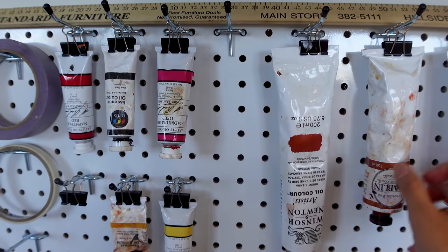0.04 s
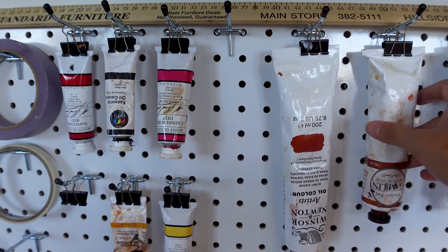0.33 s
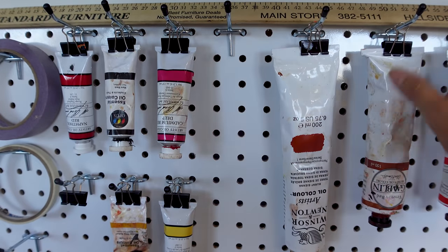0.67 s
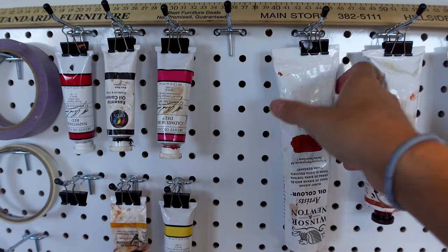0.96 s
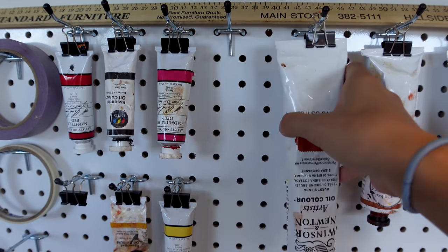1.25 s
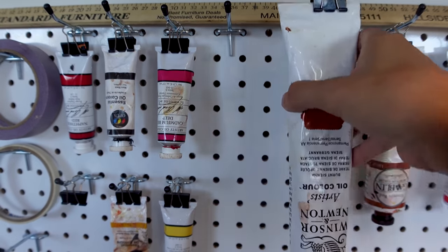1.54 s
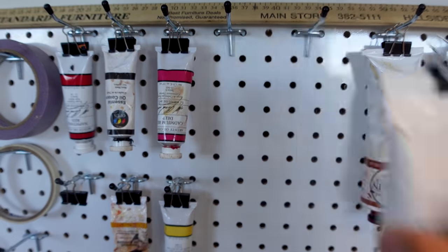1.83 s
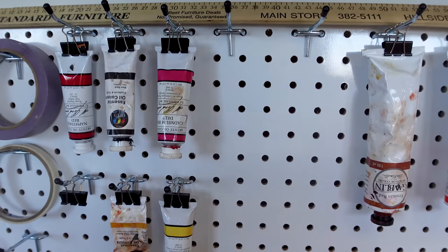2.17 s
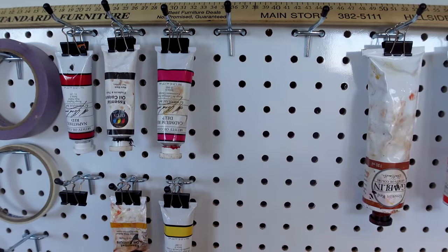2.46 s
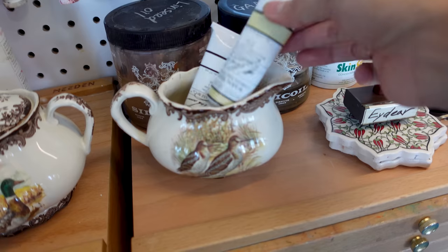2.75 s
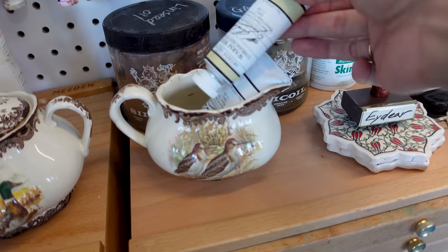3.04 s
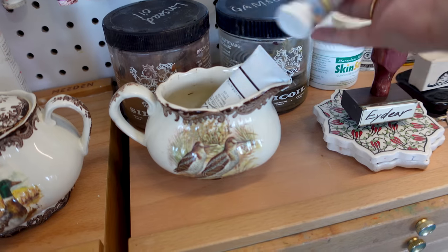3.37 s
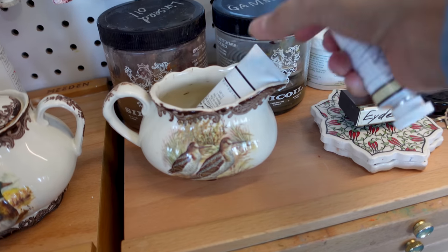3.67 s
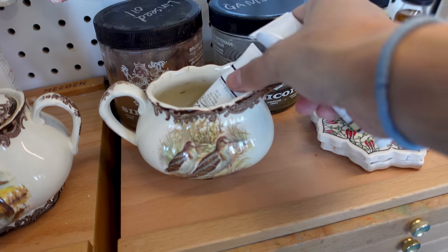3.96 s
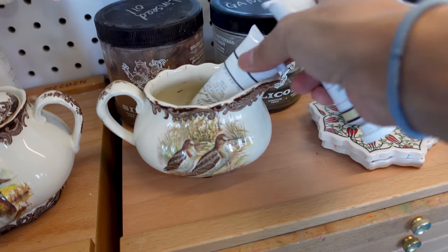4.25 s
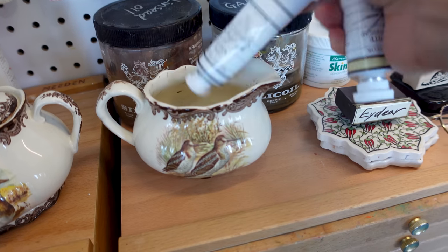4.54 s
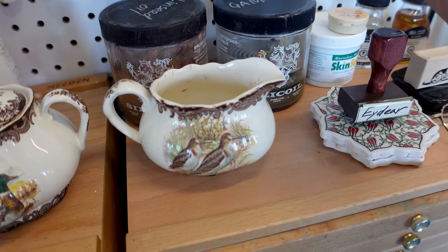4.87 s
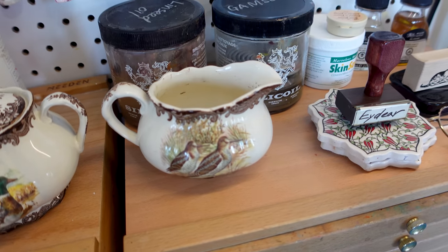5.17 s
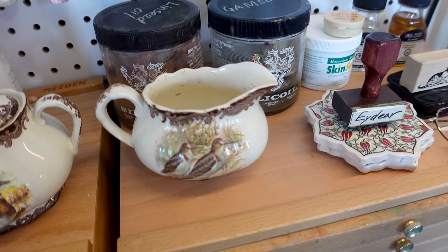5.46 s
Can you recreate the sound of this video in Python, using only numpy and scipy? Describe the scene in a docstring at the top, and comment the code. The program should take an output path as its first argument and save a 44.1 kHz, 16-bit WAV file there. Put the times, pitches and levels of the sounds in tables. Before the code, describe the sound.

A metal binder clip clicks off a pegboard hook, then paint tubes knock and clink in a ceramic jug in a quiet room.

```python
"""A paint tube, just hung up, rattles against a pegboard in a small studio. The next is lifted off: its
binder clip clicks along the wire hook, which snaps back into the board. Then tubes knock in a ceramic jug
on a wooden table. Each impact excites the modes of the body struck, and friction adds a hiss as fingers
rub and crinkle the tubes. Between board and jug a bird whistles twice outside, over soft room noise."""
import sys
import numpy as np
from scipy import signal
from scipy.fft import rfft, irfft
from scipy.io import wavfile

SR = 44100
rng = np.random.default_rng(int(sys.argv[2]) if len(sys.argv) > 2 else 0)


def master(y):
    """Save y as 16-bit WAV."""
    cut = np.clip(np.atleast_2d(y).T, -1, 1)
    pcm = np.round(cut * 32767)  # scale
    wavfile.write(sys.argv[1], SR, pcm.astype(np.int16))


N = 242991
TIME = np.arange(N) / SR

# Impacts. Each row: start in seconds, level in dB, spectral tilt in dB per octave.
BOARD_KNOCKS = [(0.0095, -8, -2), (0.0215, -20, 5), (0.0578, -17, -1.5), (0.0843, -21, -1),
                (0.0995, -20, -1.5), (0.1587, -29, 0), (1.5726, -2.5, 4), (1.5818, -11, 1.5),
                (1.6212, -18.5, 1.5)]   # hook and tube on the pegboard
CLIP_CLICKS = [(1.193, -27, -9), (1.21, -30.5, -8), (1.2658, -18.5, -4), (1.3013, -15.5, 1.5),
               (1.352, -19.5, 3), (1.3876, -10, 4), (1.426, -16.5, -2.5), (1.4436, 3, 5.5),
               (1.4474, -7.5, 0), (1.4568, -11, 2), (1.4611, -5, 3.5), (1.472, -2, 4.5), (1.4887, -9.5, 0),
               (1.497, -12, 1), (1.5568, -13, -4.5), (1.5753, -5.5, -1)]   # steel clip on its hook; the last is the hook's snap
TUBE_TICKS = [(0.9945, -36, -3), (1.0511, -36.5, -2), (2.2295, -26, 5.5), (2.258, -31, 4.5),
              (3.206, -35, -10.5), (3.4917, -26.5, -4.5), (3.7228, -37, -9), (3.8969, -33, -8.5),
              (3.9448, -34.5, -10.5), (4.585, -26, 1), (4.8244, -26.5, -2), (4.8657, -34, -5.5),
              (4.9515, -26.5, -1)]   # soft metal tubes in the fingers
# Tubes striking the jug. Each row: start in seconds, level in dB, tilt in dB per octave,
# ringing from the lip in dB, ringing from the wall in dB.
JUG_KNOCKS = [(2.771, -33, 2, -74, -83), (2.845, -24.5, -9, -52.5, -85), (2.8885, -12.5, -2.5, -41, -72),
              (2.8995, -14, -6.5, -48, -66), (2.9023, -18, 6, -46.5, -70), (2.9054, -6.5, -5.5, -31, -61),
              (2.9279, -11.5, -8, -43.5, -60), (2.988, -37, -15, -45, -80), (4.1902, -31.5, 4, -56, -89),
              (4.2542, -17, 3.5, -64, -56), (4.266, 2, 5, -57, -37), (4.2783, -5, 1.5, -63, -27),
              (4.3249, -28, 0.5, -70, -39), (4.4333, -3, -1.5, -69, -35), (4.4353, -6.5, 0, -67, -61),
              (4.448, -1.5, -1, -62, -54)]
# A leaning tube damps the jug. Each row: start in seconds, length in seconds, ringing lost in dB.
JUG_LEANS = [(2.938, 0.023, 19), (3.092, 0.06, 12), (4.353, 0.02, 5), (4.436, 0.022, 11.5)]

# Runs of bounces, then friction strokes.
# Each row: start in seconds, length in seconds, first level in dB, change in dB per second.
BOARD_RATTLE = (-0.01, 0.07, -17.5, -82)   # the hung tube swings to rest
CLIP_RATTLE = (1.395, 0.165, -19.5, -12)
BOARD_BUZZES = [(0.015, 0.27, -39.5, -71)]   # tube and clip chatter on the board
JUG_BUZZES = [(4.262, 0.16, -40.5, -42)]   # the lifted tube buzzes against the jug
GLAZE_DRAGS = [(2.86, 0.033, -65, 50), (4.07, 0.074, -77.5, 60)]   # a cap drags on the glaze
HOOK_SLIDES = [(1.19, 0.078, -64, -9.5), (1.285, 0.27, -51.5, -14.5)]
FINGER_SLIDES = [(3.225, 0.23, -61, -25), (4.87, 0.33, -65, -22)]   # fingers slide on a tube
TUBE_CRINKLES = [(2.235, 0.076, -63, -30), (2.333, 0.015, -53.5, -150), (2.355, 0.07, -51.5, -105)]   # a gripped tube's thin wall crinkles
TUBE_SHIFTS = [(3.725, 0.28, -55, -31)]   # tubes shift against each other

# Spectral envelopes of the bodies, surfaces and room noise. Each row: frequency in Hz, level in dB.
BOARD_SPECTRUM = [(40, -69), (90, -46), (140, -28.5), (250, -19.5), (450, -20.5), (750, -10.5),
                  (1000, -1.5), (1250, 1.5), (1600, -1.5), (2100, -5), (2800, -12), (6200, -13),
                  (9000, -27.5), (16000, -49.5)]
CLIP_SPECTRUM = [(60, -63), (350, -41), (650, -22.5), (1000, -7), (1300, -0.5), (1800, 1.5), (2300, -3),
                 (3300, -0.5), (4300, -4.5), (4900, -11), (6000, 1.5), (7000, -10), (11000, -19.5),
                 (13500, -27), (16000, -44.5)]
JUG_SPECTRUM = [(40, -57), (75, -26), (115, -15.5), (180, -3.5), (330, -8.5), (470, -5.5), (670, -2.5),
                (820, 7), (1500, 2.5), (2200, -0.5), (3400, -16), (4300, -16.5), (7000, -25),
                (11500, -33.5), (16000, -59)]
TUBE_SPECTRUM = [(100, -28), (600, -20), (1500, 3), (2200, 5), (3500, 1), (6000, -7.5), (10000, -14),
                 (16000, -37)]
SKIN_SPECTRUM = [(800, -18), (2500, 4), (3800, 1), (5200, -1.5), (7000, -11), (10000, -20.5), (16000, -31)]
CRINKLE_SPECTRUM = [(1000, -25), (3500, -6.5), (5000, -4), (6200, 2), (7100, -5.5), (8000, 0), (9500, -6),
                    (11500, -17), (16000, -29)]
SHIFT_SPECTRUM = [(200, -33), (700, -11), (1000, 0.5), (1500, 3.5), (2000, -4), (3000, -13.5),
                  (6000, -29.5), (16000, -48)]
AIR_SPECTRUM = [(20, -28), (50, -22), (100, -24.5), (160, -19.5), (350, -14.5), (600, -10), (900, -2),
                (1150, 0.5), (1450, -4), (2000, -10.5), (3200, -16.5), (5000, -25.5), (9000, -31.5),
                (16000, -36)]

# Damped resonances. Each row: centre in Hz, width in Hz, height in dB.
BOARD_PEAKS = [(1226, 62, 7.5), (1390, 35, 0), (1530, 50, 2), (1980, 90, 2)]
CLIP_PEAKS = [(1924, 230, 5), (2700, 170, 5), (3310, 98, 3), (3730, 70, 6), (3900, 120, 5), (4270, 86, 6),
              (5710, 260, 4.5), (6480, 240, 4.5), (7600, 100, 5), (10700, 290, 2.5), (11300, 300, 6.5)]
JUG_PEAKS = [(780, 100, 1.5), (930, 100, 3.5), (1188, 130, 4), (1496, 96, 4.5), (1944, 48, 4),
             (1990, 58, 5.5), (4250, 340, 11), (5830, 330, 8.5), (6940, 290, 9)]   # jug and table together
GLAZE_PEAKS = [(9530, 300, 32)]   # the mode that sings under a dragged cap
WIRE_MODES = [(4060, -9, .2), (4300, -4, .25), (4350, -8, 0.27), (5760, -10.5, .4), (5640, -7, 0.546),
              (5810, -11.5, 0.38), (5610, 3.5, 0.46), (5630, 4, 0.34), (6100, -9.5, 0.34),
              (6250, 13.5, 0.318), (6000, -1.5, 0.28), (5930, 6.5, 0.31), (6380, -10.5, .3),
              (6570, -7.5, .28), (7900, -10.5, .2), (11500, -12.5, 0.2)]
# Modes of the jug. Each row: frequency in Hz, level in dB when struck at the lip,
# level in dB when struck on the wall, T60 in seconds.
JUG_MODES = [(2164, -26, -20, .3), (2428, -15, -14, .3), (2455, -28, 1, .38), (2757, -2, -15, .4),
             (2774, -14, -4, .3), (3187, -28, -29, .25), (3505, -17, -28, .35), (4010, -15, -20, .13),
             (4247, -22, -14, .2), (4330, -28, -17, .16), (4450, -30, -19, .2), (5200, -16, -35, .28),
             (5770, -29, -23, .18), (5835, -28, -19, .2), (5960, -30, -22, .15), (6767, -20, -23, .16),
             (7127, -20, -21, .22), (7250, -28, -24, .18), (7660, -28, -28, .14), (8473, -23, -21, .14),
             (9469, -3, -38, .08), (10010, -15, -35, .09), (11150, -15, -36, .07), (11364, -26, -23, .08),
             (13200, -34, -31, .08)]

# Bird calls. Each row: start in seconds, length in seconds, loudest moment in seconds, its level in dB.
WHISTLES = [(1.809, 0.3, 2.027, -53.5), (2.331, 0.454, 2.56, -56.5)]
# Course of the room noise. Each row: time in seconds, level in dB.
AIR_LEVEL = [(0.9, -59.5), (1.9, -57), (3.1, -59.5), (5.5, -60)]
# Faint tones in the room. Each row: start in seconds, end in seconds, frequency in Hz, level in dB.
ROOM_TONES = [(0, 1.15, 196, -83.5), (2.788, 5.51, 985, -72), (4.85, 5.525, 1421, -68.5)]
# Reverberation of the studio. Each row: frequency in Hz, T60 in seconds.
ROOM_T60 = [(100, 0.75), (400, 0.63), (1200, 0.45), (3000, 0.73), (6000, 0.7), (10000, 0.53), (16000, 0.23)]


def pegboard():
    """Impact excitation: hook and tube knock, bounce and chatter on the resonant board."""
    contacts = BOARD_KNOCKS + bounces(BOARD_RATTLE, tilt_db=0.5, scatter_db=5, count=9)
    raps = knocks(contacts, BOARD_SPECTRUM, BOARD_PEAKS,
                  ring_db=-16, ring_t60=0.034, doubling_db=17, uneven_db=0, spread_s=0.000849)
    return raps + rub(BOARD_BUZZES, BOARD_SPECTRUM, BOARD_PEAKS, attack_s=.01, release_s=.36, grain_db=1.5)


def binder_clip(wire_db, snap_db):
    """Free vibration after impact: each click sets the wire ringing, with extra force at the snap."""
    contacts = CLIP_CLICKS + bounces(CLIP_RATTLE, tilt_db=3.5, scatter_db=5.5, count=9)
    out = knocks(contacts, CLIP_SPECTRUM, CLIP_PEAKS,
                 ring_db=-21.5, ring_t60=0.022, doubling_db=28, uneven_db=3.5, spread_s=.0012)
    wire = wire_ring(split=0.07, count=6)
    snap_s = CLIP_CLICKS[-1][0]
    for start, level_db, _ in contacts:
        add(out, start, from_db(level_db + wire_db + snap_db * (start == snap_s)) * wire)
    return out


def wire_ring(split, count):
    """Beating: handles and hook are nearly alike, so each mode splits into close ones that shimmer."""
    detunings = 1 + split * rng.uniform(-1, 1, (count, len(WIRE_MODES)))
    modes = [(hz * k, db, t60) for row in detunings for (hz, db, t60), k in zip(WIRE_MODES, row)]
    return ring(modes) / np.sqrt(count)


def jug():
    """Modal superposition: over the thud of jug and table, clear modes ring; leaning tubes damp them."""
    out = knocks(JUG_KNOCKS, JUG_SPECTRUM, JUG_PEAKS,
                 ring_db=-22, ring_t60=0.037, doubling_db=33, uneven_db=1.5, spread_s=0.000611)
    hz, lip_mode_db, wall_mode_db, t60 = np.transpose(JUG_MODES)
    modes = np.array([ring([(f, 0, decay)]) for f, decay in zip(hz, t60)])
    lost_db = sum(db * np.clip((TIME - start) / length, 0, 1) for start, length, db in JUG_LEANS)
    for start, _, tilt_db, lip_db, wall_db in JUG_KNOCKS:
        # the place struck picks the modes; a hard cap favours the high ones
        amplitudes = from_db(lip_db + lip_mode_db) + from_db(wall_db + wall_mode_db)
        amplitudes *= from_db(tilt_db * np.log2(hz / hz[0]))
        onset = int(start * SR)
        damping = from_db(lost_db[onset] - lost_db[onset:onset + modes.shape[1]])
        add(out, start, amplitudes @ modes * damping)
    return out


def jug_rubbing():
    """Friction drives resonance: a tube buzzes against the jug, and a dragged cap sings on the glaze."""
    buzz = rub(JUG_BUZZES, JUG_SPECTRUM, JUG_PEAKS, attack_s=0.097, release_s=0.039, grain_db=1.5)
    return buzz + rub(GLAZE_DRAGS, SKIN_SPECTRUM, GLAZE_PEAKS, attack_s=.16, release_s=.1, grain_db=2)


def hands():
    out = knocks(TUBE_TICKS, TUBE_SPECTRUM, (),
                 ring_db=-17.5, ring_t60=0.016, doubling_db=60, uneven_db=3, spread_s=0.0014)
    out += rub(HOOK_SLIDES, CLIP_SPECTRUM, CLIP_PEAKS, attack_s=.17, release_s=.08, grain_db=3.5)
    out += rub(FINGER_SLIDES, SKIN_SPECTRUM, (), attack_s=.05, release_s=0.7, grain_db=0)
    out += rub(TUBE_CRINKLES, CRINKLE_SPECTRUM, (), attack_s=0.028, release_s=0.099, grain_db=3.5)
    return out + rub(TUBE_SHIFTS, SHIFT_SPECTRUM, (), attack_s=0.043, release_s=.28, grain_db=2.5)


def knocks(contacts, spectrum, peaks, ring_db, ring_t60, doubling_db, uneven_db, spread_s, size=8192):
    """Transient response: each contact is a crack followed by the body's dense, quickly dying modes."""
    out, t = np.zeros(N), np.arange(size) / SR
    for start, level_db, tilt_db, *_ in contacts:
        t60 = ring_t60 * 2 ** (-level_db / doubling_db)   # a softer, looser contact rings longer
        blow = from_db(ring_db) * flat_noise(size) * decay(t, t60)
        blow[0] = 1   # the crack
        body = body_response(spectrum, peaks, tilt_db, uneven_db, spread_s)
        add(out, start, from_db(level_db) * signal.fftconvolve(blow, body))
    return out


def bounces(run, tilt_db, scatter_db, count):
    """Rattling: a loose part rebounds at uneven intervals, giving rows of small impacts."""
    start, length, level_db, db_per_s = run
    lateness, strength = rng.random((count, 2)).T
    delays = length * (np.arange(count) + .5 * lateness) / count
    levels_db = level_db + db_per_s * delays + scatter_db * (2 * strength - 1)
    return [(start + delay, db, tilt_db) for delay, db in zip(delays, levels_db)]


def rub(strokes, spectrum, peaks, attack_s, release_s, grain_db):
    """Stick-slip friction: countless tiny slips, coloured by the surface, follow each stroke's pressure."""
    pressure = 0
    for start, length, level_db, db_per_s in strokes:
        t = TIME - start
        edges = decay(np.maximum(-t, 0), attack_s) * decay(np.maximum(t - length, 0), release_s)
        pressure += edges * from_db(level_db + db_per_s * np.clip(t, 0, length))
    slips = rng.standard_normal(N) * from_db(grain_db * drift(600))
    hiss = signal.fftconvolve(slips, body_response(spectrum, peaks))[:N]
    return pressure * np.sqrt(N) * unit_energy(hiss)


def ring(modes, size=32768):
    """Damped oscillation: modes (Hz, dB, T60) build up over the brief contact, then decay freely."""
    t = np.arange(size) / SR
    contact_s = .0005
    ringing = sum(from_db(db) * decay(t, t60) * np.sin(2 * np.pi * hz * t) for hz, db, t60 in modes)
    return np.minimum(t / contact_s, 1) * ringing


def body_response(spectrum, peaks=(), tilt_db=0, uneven_db=0, spread_s=0, size=4096):
    """Impulse response: a causal click of unit energy with a body's spectrum and resonances."""
    hz = np.maximum(np.fft.rfftfreq(size, 1 / SR), 1)
    db = at_hz(spectrum, hz) + tilt_db * np.log2(np.clip(hz, 500, 12000) / 2000)
    for centre, width, height_db in peaks:
        db += height_db / (1 + (2 * (hz - centre) / width) ** 2)
    # each point of contact favours different modes
    db += uneven_db * np.interp(hz, np.geomspace(1000, SR / 2, 40), rng.standard_normal(40))
    cepstrum = irfft(np.log(from_db(db)))
    minimum_phase = np.exp(rfft(2 * cepstrum[:size // 2], size))
    # bending waves: highs arrive first, 1 kHz comes spread_s late
    dispersion = np.exp(-4j * np.pi * spread_s * np.sqrt(1000 * hz))
    return unit_energy(irfft(minimum_phase * dispersion))


def bird(waver_hz, flutter_db, rasp_hz):
    """Frequency modulation: a nearly pure tone slides up and settles, wavering with a faint rasp."""
    top_hz, rise_hz, rise_s = 2924, 321.5, 0.2
    swell_db_per_s, fade_db_per_s, edge_s = 63, 65, 0.023
    out = 0
    for start, length, loudest, level_db in WHISTLES:
        t = np.clip(TIME - start, 0, length)
        glide_hz = top_hz - rise_hz * np.maximum(1 - t / rise_s, 0) ** 2
        whistle = tone(glide_hz + waver_hz * drift(60) + rasp_hz * drift(700))
        swell_db = np.minimum(swell_db_per_s * (TIME - loudest), fade_db_per_s * (loudest - TIME))
        edges = np.minimum(np.minimum(t, length - t) / edge_s, 1)
        out += edges * from_db(level_db + swell_db + flutter_db * drift(53)) * whistle
    return out


def studio(direct, side_db, **echoes):
    """Decorrelation: direct sound is central; reflections differ a little at two close microphones."""
    mid, side = (signal.fftconvolve(direct, reflections(**echoes))[:N] for _ in range(2))
    return direct + mid + from_db(side_db) * side * [[1], [-1]]


def reflections(early_db, early_t60, late_db, treble_db, size=32768):
    """Reverberation: quick echoes from things nearby, then a tail dying at its own rate in each band."""
    t, hz = np.arange(size) / SR, np.fft.rfftfreq(size, 1 / SR)
    white, tail = rfft(flat_noise(size)), 0
    for band_hz, t60 in ROOM_T60:
        band = at_hz([(f, f == band_hz) for f, _ in ROOM_T60], hz)
        tail += irfft(white * band) * decay(t, t60)
    treble_tilt = from_db(treble_db * np.log2(np.maximum(hz / 5000, 1)))   # per octave above 5 kHz
    tail = irfft(rfft(unit_energy(tail * (t > .012))) * treble_tilt)
    early = flat_noise(size) * decay(t, early_t60) * (t > .004)
    return from_db(early_db) * unit_energy(early) + from_db(late_db) * tail


def room_noise(side_db, waver_hz):
    """Noise floor: a soft broadband rush with a few faint wavering tones."""
    mid, side = (signal.fftconvolve(rng.standard_normal(N + 4095), body_response(AIR_SPECTRUM), "valid")
                 for _ in range(2))
    tones, edge_s = 0, 0.1
    for start, end, hz, level_db in ROOM_TONES:
        edges = np.clip(np.minimum(TIME - start, end - TIME) / edge_s, 0, 1)
        tones += edges * from_db(level_db) * tone(hz + waver_hz * drift(30))
    rush_db = np.interp(TIME, *np.transpose(AIR_LEVEL))
    return tones + from_db(rush_db) * (mid + from_db(side_db) * side * [[1], [-1]])


def tone(hz):
    """Phase is the integral of frequency: a sine of unit rms."""
    return np.sqrt(2) * np.sin(2 * np.pi * np.cumsum(hz) / SR)


def flat_noise(size):
    """White noise: equal magnitudes with random phases, at unit rms."""
    return unit_energy(irfft(np.exp(2j * np.pi * rng.random(size // 2 + 1)))) * np.sqrt(size)


def drift(rate_hz):
    """Random modulation with a spread near one."""
    knots = rng.standard_normal(N // 10)
    return np.interp(TIME * rate_hz, np.arange(len(knots)), knots)


def decay(t, t60):
    """Exponential decay: 60 dB in t60 seconds."""
    return np.exp(-np.log(1000) * t / max(t60, .002))


def at_hz(points, hz):
    """Interpolation on a log-frequency axis."""
    f, value = np.transpose(points)
    return np.interp(np.log(np.maximum(hz, 1)), np.log(f), value)


def from_db(db):
    """Decibels as an amplitude ratio."""
    return 10 ** (np.asarray(db) / 20)


def unit_energy(x):
    """Normalisation to an energy of one."""
    return x / np.sqrt(np.sum(x ** 2) + 1e-20)


def add(out, start, sound):
    """Superposition: a sound joins the mix at a given second."""
    i = max(int(round(start * SR)), 0)
    out[i:i + len(sound)] += sound[:N - i]


def scene():
    """Linear superposition: each source, with its own reflections, adds to the room noise."""
    wall = studio(pegboard() + binder_clip(wire_db=-52, snap_db=12),
                  early_db=-10.5, early_t60=0.15, late_db=-16.5, treble_db=2.5, side_db=-9.5)
    table = studio(jug() + jug_rubbing(),
                   early_db=-8, early_t60=0.068, late_db=-12, treble_db=-1.5, side_db=-12)
    handling = studio(hands(), early_db=-9.5, early_t60=0.089, late_db=-9.5, treble_db=-3, side_db=-6)
    outside = studio(bird(waver_hz=7, flutter_db=0.5, rasp_hz=50),
                     early_db=-15, early_t60=0.35, late_db=-6.5, treble_db=1, side_db=-5)
    return wall + table + handling + outside + room_noise(side_db=-9.5, waver_hz=4)


def record(dry):
    """Band limiting: the microphone thins the deep bass, and the top is cut steeply."""
    low_cut_hz, high_cut_hz = 100, 15850
    thinned = signal.sosfilt(signal.butter(2, low_cut_hz, "high", fs=SR, output="sos"), dry)
    return signal.sosfilt(signal.ellip(10, .2, 80, high_cut_hz, fs=SR, output="sos"), thinned)


dry = scene()
out = record(dry)
master(out)
```